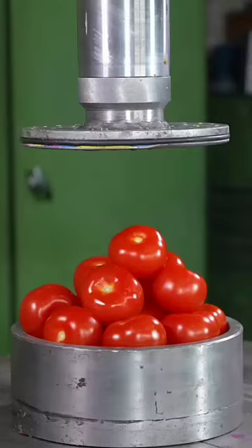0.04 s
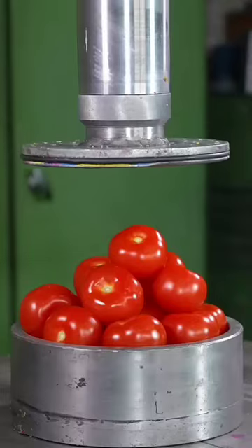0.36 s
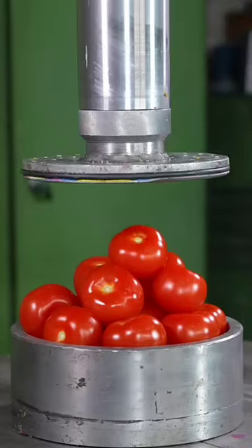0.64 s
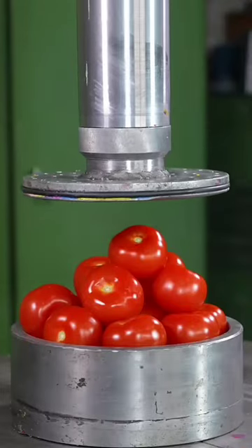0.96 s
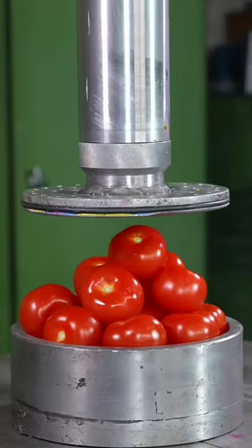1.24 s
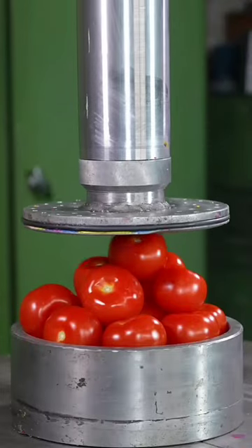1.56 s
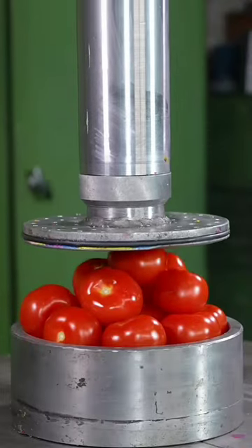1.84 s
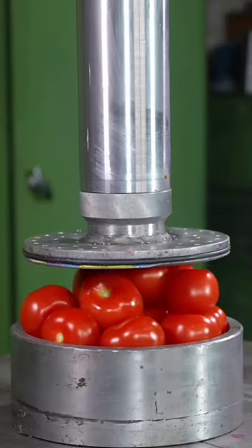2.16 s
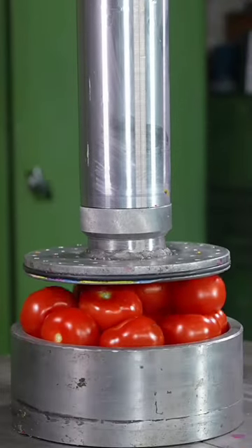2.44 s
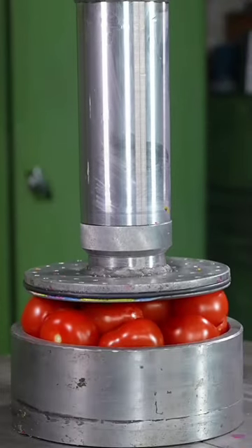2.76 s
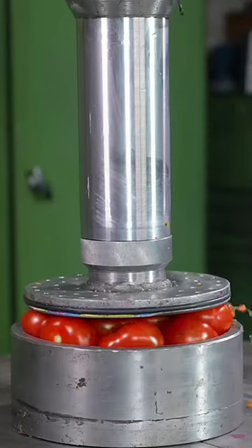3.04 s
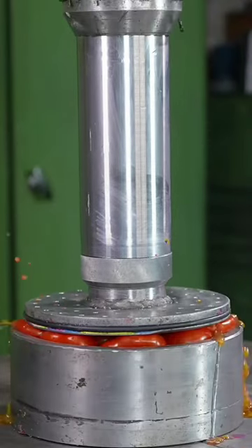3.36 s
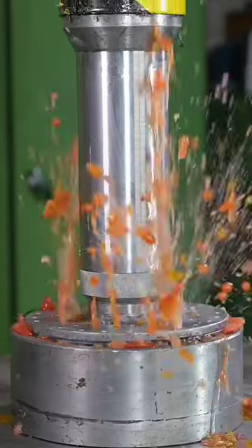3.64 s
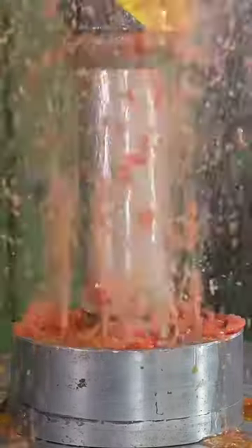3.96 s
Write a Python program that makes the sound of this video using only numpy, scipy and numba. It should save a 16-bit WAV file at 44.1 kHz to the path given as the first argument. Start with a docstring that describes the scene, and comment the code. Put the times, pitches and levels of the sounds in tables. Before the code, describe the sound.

Steady hum of a hydraulic press, ending in crushed tomatoes squirting and spattering juice.

```python
"""Tomatoes under a hydraulic press

Close beside the press, one microphone. The pump hums, twelve strokes to a shaft turn, over a rush of oil.
Late on, the tomatoes in the steel pot squelch and spit a little, then burst: juice jets out of the gap
round the plate, and pulp spatters and thuds on everything near."""
import sys
import numpy as np
from scipy import signal
from scipy.fft import rfft, irfft
from scipy.io import wavfile
from scipy.ndimage import uniform_filter1d, map_coordinates
from numba import njit

SR = 44100
rng = np.random.default_rng(int(sys.argv[2]) if len(sys.argv) > 2 else 0)


def dump_mix(stems):
    """Bounce the given channels to the path in sys.argv[1] as a 16-bit WAV at rate SR."""
    frames = np.atleast_2d(stems).T  # one column per channel
    limited = np.clip(frames, -1, 1)  # hard clip at full scale
    pcm = np.round(limited * 32767).astype(np.int16)
    wavfile.write(sys.argv[1], SR, pcm)


N = 176400
START_S, STROKES_PER_TURN = .15, 12

# the pump's stroke rate: t/s, f/Hz
STROKE_RATE = [(0, 296.5), (1.9, 296.6), (2.4, 297.3), (4, 297.3)]
def stroke_phase():
    """The pump's pace wanders slightly; the phase gains 2 pi a stroke."""
    hz = curve(STROKE_RATE) * (1 + .0007 * walk(12))
    return 2 * np.pi * np.cumsum(hz) / SR


# the hum's fundamental, beside the press: t/s, level/dB
HUM = [(0.17, -20.5), (0.54, -19), (0.94, -20), (1.18, -23), (1.48, -21), (2.8, -22), (3.45, -20.5),
       (3.77, -24), (3.99, -20)]
# its overtones before trim: t/s, then level/dB for each of harmonics 2 to 7
OVERTONES = [(0.17, -43, -56, -40.5, -52, -49, -61), (0.26, -36.5, -54.5, -41, -55, -51, -50),
             (0.5, -37, -56.5, -38.5, -54, -71, -67.5), (0.83, -36, -51.5, -37, -47, -64, -69),
             (0.97, -40, -47.5, -38, -51.5, -51, -64), (1.05, -42, -68, -35.5, -52, -53, -58),
             (1.16, -38, -52.5, -42.5, -52, -52.5, -52.5), (1.29, -37, -64, -38, -49.5, -49.5, -60),
             (1.36, -36.5, -62, -40, -48.5, -56, -52.5), (1.42, -37, -60.5, -36, -56, -51, -70.5),
             (1.6, -36, -60, -36.5, -47.5, -56.5, -68.5), (2.13, -41, -54, -41, -57, -59, -59.5),
             (2.21, -34, -58.5, -47.5, -59, -55.5, -58), (2.4, -40, -53.5, -39.5, -59.5, -53.5, -58.5),
             (2.72, -35, -50, -39.5, -60.5, -56.5, -59.5), (2.9, -40, -44.5, -38, -62, -52.5, -57.5),
             (2.96, -41.5, -48.5, -38, -48.5, -52, -58), (3.02, -36.5, -41.5, -52, -66, -51, -61),
             (3.08, -37, -50, -44.5, -66, -47.5, -55.5), (3.22, -35.5, -42.5, -50, -55, -51, -58),
             (3.4, -38, -50.5, -51, -64, -49.5, -58.5), (3.55, -35, -47.5, -50.5, -52.5, -51.5, -58),
             (3.75, -38.5, -46.5, -52, -54, -49, -62)]
# trim on each of harmonics 2 to 7: level/dB
OVERTONE_TRIM = [0.96, 1, 0.86, 0.14, -0.014, -0.29]
# whine above the hum: harmonic, level/dB
WHINE = [(8, -62), (9, -70.5), (10, -66.5), (11, -75), (12, -66.5), (13, -73), (15, -72.5), (17, -77.5),
         (18, -66.5), (20, -72), (21, -73), (22, -71), (23, -78.5), (26, -83), (28, -82.5), (29, -86),
         (31, -84), (32, -79.5)]
# thin whistle on harmonic 19: t/s, level/dB
WHISTLE = [(.32, -56), (.44, -65), (.95, -61), (1.12, -56.5), (1.3, -65), (1.9, -62.5), (2.07, -56),
           (2.33, -62), (3.7, -61.5)]
# sidebands from unequal strokes: multiple of the shaft rate, level/dB
SIDEBANDS = [(10, -58.5), (11, -59), (13, -49.5), (20, -55), (23, -64.5), (35, -58), (37, -57.5), (47, -64),
             (58.6, -59.5), (83, -69), (85, -66.5)]
def pump(phase):
    """Pressure strokes make a strong hum with overtones, a thin whine and sidebands."""
    def partial(multiple, db):
        return np.sqrt(2) * undb(db) * np.sin(multiple * phase + 2 * np.pi * rng.random())
    flutter_db, whine_waver_db, sideband_waver_db = .49, 3, 3.5
    tone = partial(1, curve(HUM) + flutter_db * walk(30))
    for column, trim_db in enumerate(OVERTONE_TRIM, start=1):
        tone += partial(column + 1, curve(OVERTONES, column) + trim_db + flutter_db * walk(25))
    for harmonic, db in WHINE:
        tone += partial(harmonic, db + whine_waver_db * walk(5.99))
    tone += partial(19, curve(WHISTLE))
    for multiple, db in SIDEBANDS:
        tone += partial(multiple / STROKES_PER_TURN, db + sideband_waver_db * walk(9))
    return tone


# spatter landing round the pot: t/s, level/dB
SPATTER = [(3.8, -58), (3.858, -44), (3.876, -25.5), (3.893, -31), (3.917, -26), (3.937, -24.5),
           (3.97, -29), (4, -30.5)]
# its spectrum: f/Hz, relative level/dB
SPATTER_COLOUR = [(300, -2.5), (700, -0.5), (1200, -8), (1600, -2), (2000, -10.5), (2600, -4.5),
                  (3200, -1.5), (4300, 2), (5200, 2.5), (5800, -2), (6400, -7.5), (8000, -3.5),
                  (10000, -11.5), (12500, -14.5), (14000, -14), (15500, -27)]
def spatter():
    """Thousands of drops a second land in clumps."""
    impacts = drops(6000, spread_db=3.5)
    clumps = undb(1.5 * walk(200))
    return colour(impacts * clumps, SPATTER_COLOUR) * swell(SPATTER)


# the jet at the edge of the plate: t/s, level/dB
JET = [(3.71, -57), (3.748, -51), (3.76, -39), (3.783, -43), (3.812, -36.5), (3.835, -40), (3.852, -39.5),
       (3.9, -34.5), (4, -33.5)]
# spectrum of its fizz: f/Hz, relative level/dB
JET_COLOUR = [(1200, -10), (1800, -2), (2300, -5.5), (2900, -4), (4500, -1.5), (6500, -7.5), (8000, -5),
              (10000, -12), (12000, -17), (15500, -27)]
# resonance of the gap round the plate: t/s, f/Hz
GAP_RESONANCE = [(3.765, 4300), (3.793, 3430), (3.803, 5300), (3.84, 5600), (3.92, 4700), (4, 4200)]
def jet():
    """Juice fizzes out through the gap and makes it ring."""
    fizz = colour(drops(7000, spread_db=3.2), JET_COLOUR)
    gap = cavity(drops(6000, spread_db=3), curve(GAP_RESONANCE), width_hz=1100)
    return (fizz + undb(-.5) * gap) * swell(JET)


# spectrum of the mist: f/Hz, relative level/dB
MIST_COLOUR = [(5000, -22), (7500, -9), (9300, 5), (12000, -10), (13500, -3), (15500, -17)]
def mist():
    """The jet breaks into a brief, high hiss of fine droplets."""
    return colour(drops(9000, spread_db=2.4), MIST_COLOUR) * bump(at=3.825, half_s=.018, db=-41.5)


# pulp landing nearby: t/s, level/dB
PULP = [(3.68, -62), (3.75, -55), (3.8, -60), (3.9, -55), (3.925, -45), (3.96, -47), (4, -37)]
# its spectrum: f/Hz, relative level/dB
PULP_COLOUR = [(25, -18), (60, -13), (105, 9), (150, -8), (250, -8), (500, -32)]
def pulp():
    """Heavy lumps land with low thuds."""
    return colour(drops(700, spread_db=2), PULP_COLOUR) * swell(PULP)


# squelches down in the pot: t/s, half-length/s, f/Hz, width/Hz, level/dB
SQUELCHES = [(3.283, 0.028, 1760, 300, -48), (3.292, .018, 676, 80, -40), (3.312, .02, 473, 70, -38.5),
             (3.32, 0.011, 2400, 600, -53), (3.701, .007, 5600, 1400, -48.5), (3.776, .007, 2760, 900, -45)]
def squelches():
    """Squeezed fruit squirts through wet cavities, each with its own resonance."""
    return sum(cavity(drops(1500, spread_db=3), hz, width_hz) * bump(at, half_s, db)
               for at, half_s, hz, width_hz, db in SQUELCHES)


# small spits from the pot: t/s, half-length/s, level/dB
SPITS = [(3.415, .02, -76), (3.567, .011, -56.5), (3.628, .012, -71), (3.7, .009, -61), (3.732, .007, -62)]
# their spectrum: f/Hz, relative level/dB
SPIT_COLOUR = [(1500, -20), (4000, -3), (6500, 1), (9000, 0), (11500, -9), (14000, -8), (15500, -16)]
def spits():
    """The first juice escapes in tiny sprays ahead of the burst."""
    return colour(drops(6000, spread_db=3), SPIT_COLOUR) * sum(bump(*row) for row in SPITS)


# spectrum of the oil rush and the rattle, behind the hum: f/Hz, relative level/dB
OIL_COLOUR = [(30, -25), (70, -21.5), (120, -12.5), (175, -2.5), (205, -6), (260, 3), (330, 4), (410, -6.5),
              (500, 3), (640, 1.5), (720, -8), (1000, -9.5), (1250, -7), (1600, -8), (1780, -11.5),
              (1900, -18), (2100, -15), (2400, -14), (2800, -18), (3100, -15.5), (3600, -20), (4400, -24.5),
              (5400, -18.5), (6400, -19), (7200, -32), (8800, -37), (11300, -43), (12500, -50),
              (15500, -57.5)]
def oil(phase):
    """Oil rushes through the valves, pulsing with the strokes; a rattle repeats on each shaft turn."""
    rush_db, rattle_db, waver_db, pulse_depth = -41.5, -48.5, .62, .33
    rush = colour(rng.standard_normal(N) * (1 + pulse_depth * np.sin(phase)), OIL_COLOUR)
    turn_samples = int(SR * STROKES_PER_TURN / STROKE_RATE[0][1])
    one_turn = rng.standard_normal(turn_samples)
    position = phase / (2 * np.pi * STROKES_PER_TURN) % 1 * turn_samples
    rattle = colour(map_coordinates(one_turn, [position], mode="grid-wrap"), OIL_COLOUR)
    return undb(rush_db + waver_db * walk(10.03)) * rush + undb(rattle_db) * rattle


# faint singing of the oil in the valves, in the background: t/s, half-length/s, f/Hz, width/Hz, level/dB
VALVE_SINGING = [(.7, 0.096, 2965, 30, -58), (.65, 0.16, 2400, 220, -57.5), (2.07, .07, 2400, 160, -54.5),
                 (1.15, .08, 7750, 250, -77), (2.17, .08, 8600, 350, -75), (2.13, .11, 9510, 60, -79)]
def valve_singing():
    """The oil sings in the valves: narrow bands briefly swell and fade."""
    return sum(cavity(rng.standard_normal(N), hz, width_hz) * bump(at, half_s, db)
               for at, half_s, hz, width_hz, db in VALVE_SINGING)


def steel_reflections(splash, decay_s=.012, wet_db=-6):
    """The splash rings briefly off the steel close round it."""
    t = np.arange(SR // 4) / SR
    tail = rng.standard_normal(len(t)) * np.exp(-t / decay_s)
    reflected = signal.fftconvolve(splash, tail / np.linalg.norm(tail))[:N]
    wet = undb(wet_db)
    return (splash + wet * reflected) / np.hypot(1, wet)


def cavity(x, hz, width_hz):
    """A resonance with steep sides, like that of a liquid-lined cavity; rms 1."""
    hz, width_hz = hz * np.ones(N), float(width_hz)
    return unit(resonate(resonate(x, hz, width_hz), hz, width_hz))


@njit
def resonate(x, hz, width_hz):
    """Band-pass whose centre may move."""
    y, band_state, low_state = np.empty(len(x)), 0., 0.
    for i in range(len(x)):
        g, damping = np.tan(np.pi * hz[i] / SR), width_hz / hz[i]
        band = (band_state + g * (x[i] - low_state)) / (1 + g * (g + damping))
        band_state = 2 * band - band_state
        low_state += 2 * g * band
        y[i] = damping * band
    return y


def drops(per_s, spread_db):
    """Random tiny impacts of uneven size; rms 1."""
    size = undb(spread_db * np.clip(rng.standard_normal(N), -2, 2))
    hits = rng.random(N) < per_s / SR
    return unit(hits * size * np.sign(rng.standard_normal(N)))


def colour(x, points):
    """Shape a sound by (f/Hz, level/dB) points; rms 1."""
    hz, db = np.array(points).T
    f = np.maximum(np.fft.rfftfreq(N, 1 / SR), 1)
    gain = undb(np.interp(np.log(f), np.log(hz), db))
    return unit(irfft(rfft(x) * gain, N))


def walk(per_s):
    """Smooth random drift; rms 1."""
    hold = int(SR / per_s)
    steps = np.repeat(rng.standard_normal(N // hold + 1), hold)
    return unit(uniform_filter1d(uniform_filter1d(steps, hold), hold)[:N])


def curve(rows, column=1):
    """One column of a table, joined by straight lines in time."""
    rows = np.array(rows)
    return np.interp(np.arange(N) / SR, rows[:, 0], rows[:, column])


def swell(rows):
    """Gain from (t/s, level/dB) rows, silent before the first."""
    return undb(curve(rows)) * (np.arange(N) / SR >= rows[0][0])


def bump(at, half_s, db):
    """A bell-shaped rise and fall of gain."""
    return undb(db) * np.exp(-.5 * ((np.arange(N) / SR - at) / half_s) ** 2)


def undb(db):
    """Decibels to gain."""
    return 10 ** (np.asarray(db) / 20)


def unit(x):
    """Scale to rms 1."""
    return x / np.sqrt(np.mean(x ** 2))


def scene():
    """The running press and the fruit under it, in mono at the microphone."""
    phase = stroke_phase()
    press = pump(phase) + oil(phase) + valve_singing()
    squeeze = squelches() + spits()
    burst = steel_reflections(jet() + mist() + spatter()) + pulp()
    running = np.arange(N) / SR >= START_S
    return (running * (press + squeeze + burst))[None]


def record(dry):
    """The recorder cuts the top steeply above 15.5 kHz."""
    return signal.sosfilt(signal.ellip(10, .2, 80, 15500, fs=SR, output="sos"), dry)


dry = scene()
out = record(dry)
dump_mix(out)
```